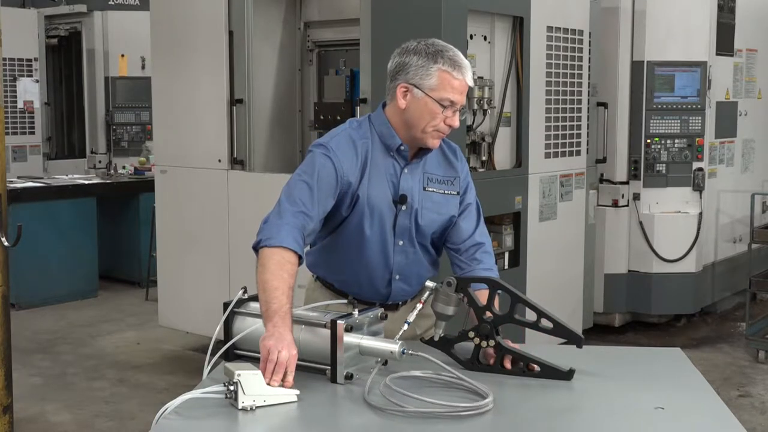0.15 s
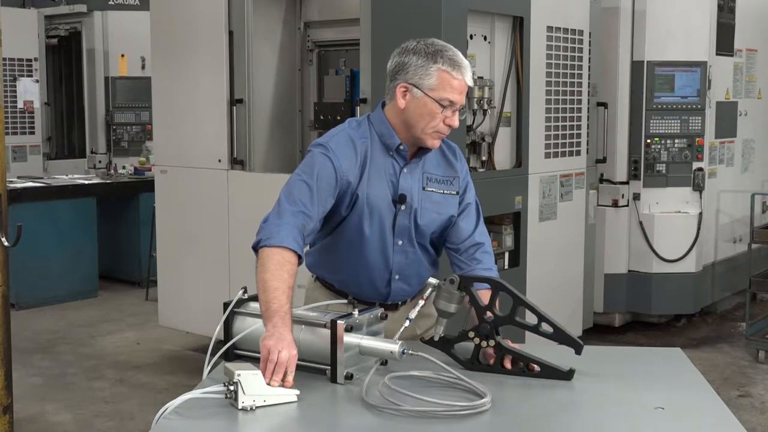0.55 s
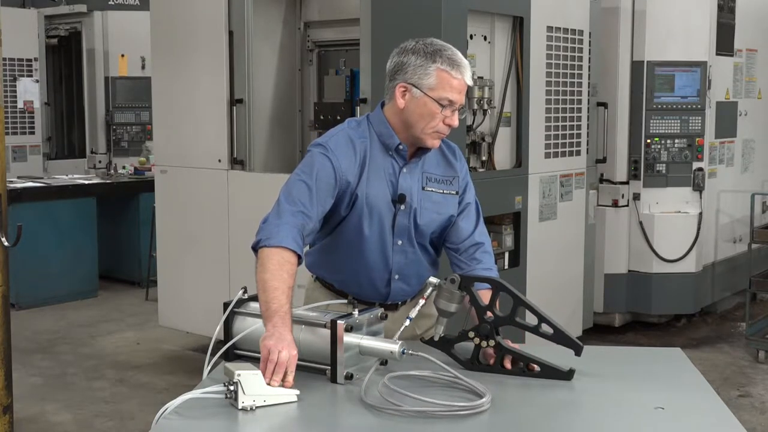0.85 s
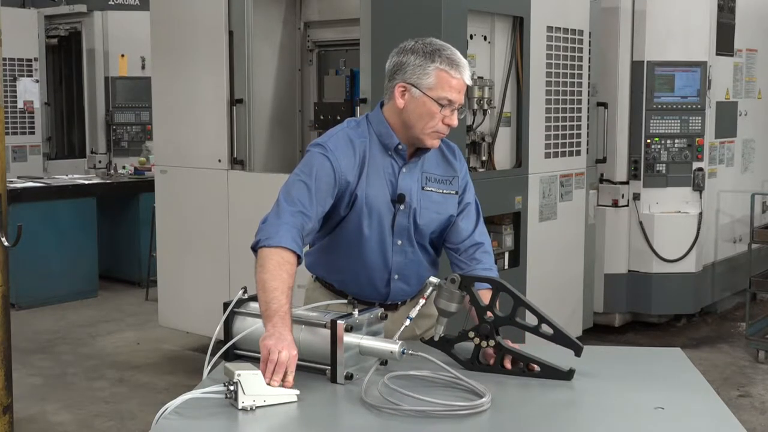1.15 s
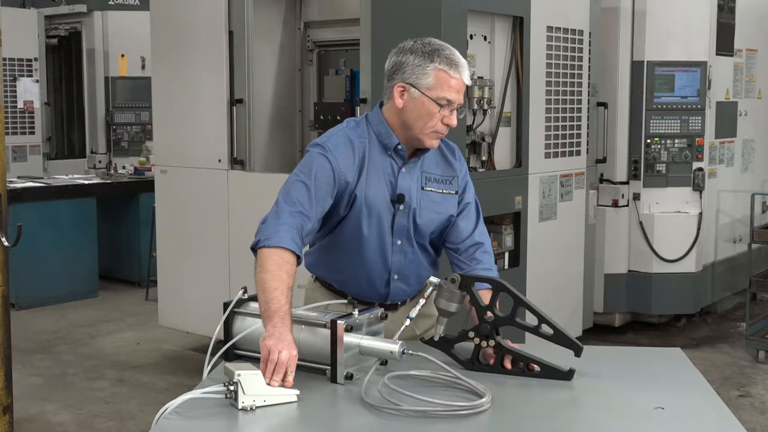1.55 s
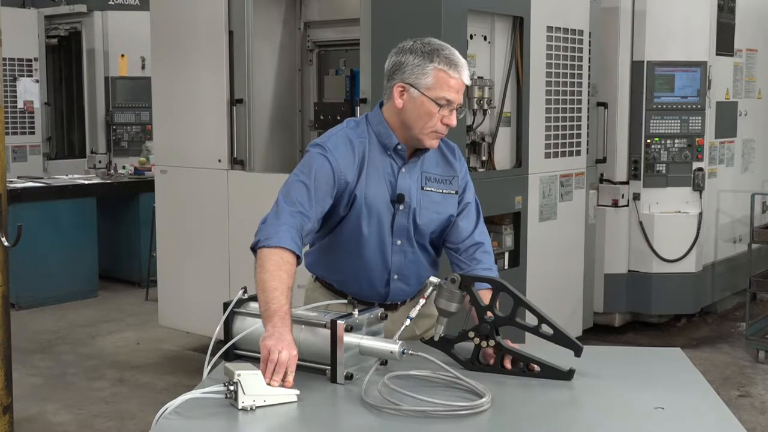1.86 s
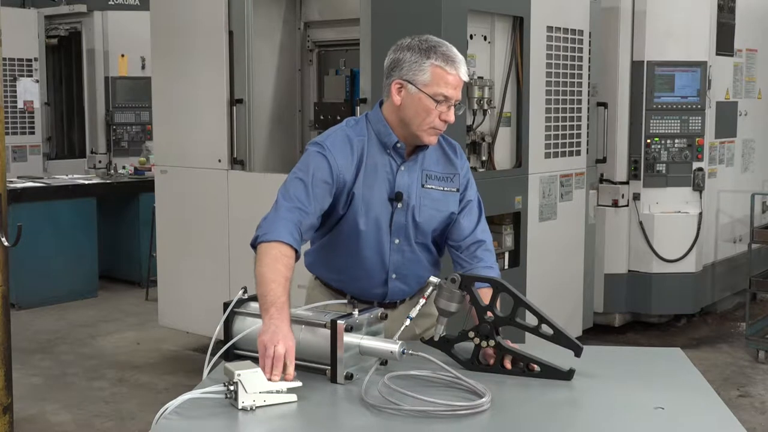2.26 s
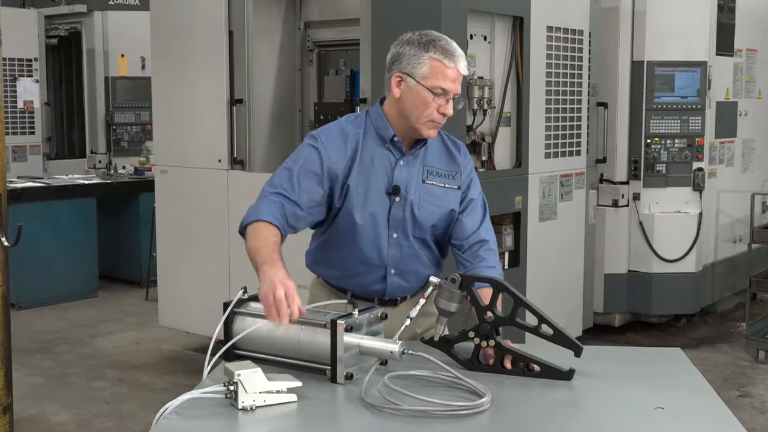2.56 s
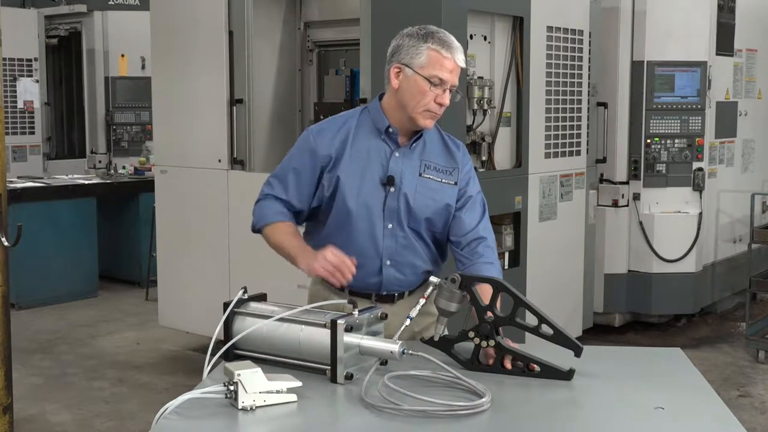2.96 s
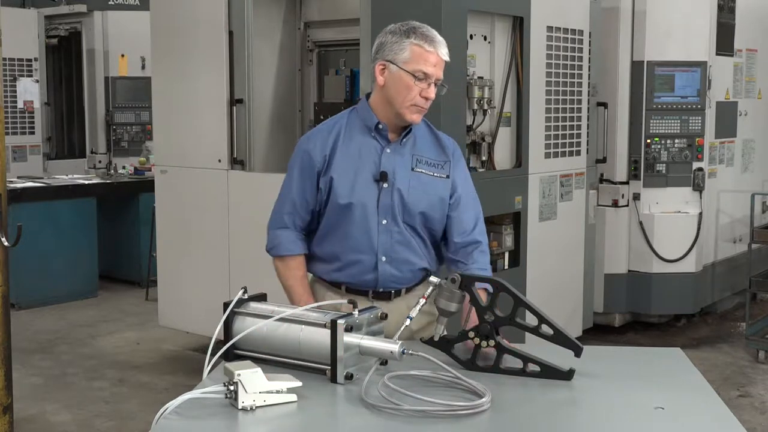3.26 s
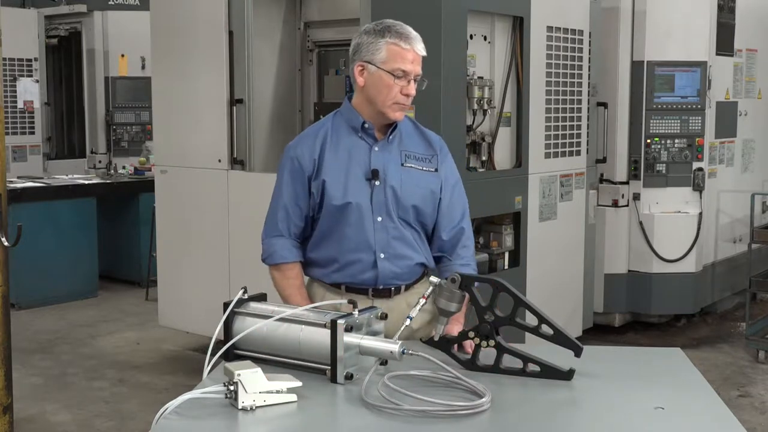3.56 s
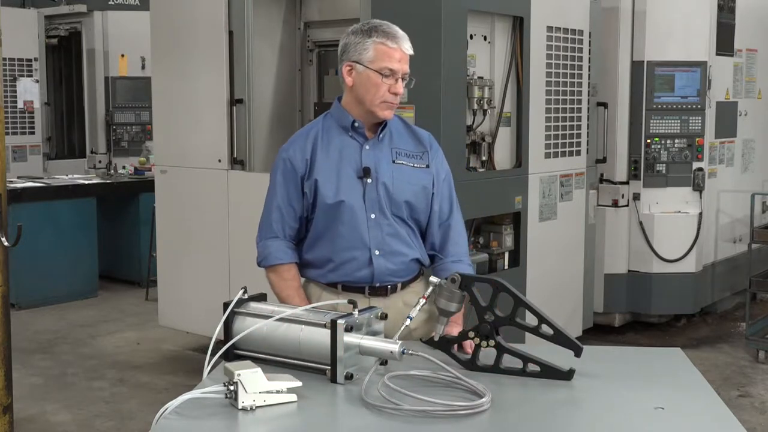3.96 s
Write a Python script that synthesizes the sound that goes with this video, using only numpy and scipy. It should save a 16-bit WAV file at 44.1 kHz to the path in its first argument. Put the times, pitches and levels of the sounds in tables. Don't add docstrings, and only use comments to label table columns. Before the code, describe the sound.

Compressed air rushes into a cylinder, the piston knocks on its stop, a thin singing hiss fades, then exhaust bursts out and slowly dies away.

```python
import sys
import numpy as np
from scipy import signal
from scipy.io import wavfile
from scipy.ndimage import uniform_filter1d

SR = 44100
rng = np.random.default_rng(int(sys.argv[2]) if len(sys.argv) > 2 else 0)


def makeup_ratio(level_db):
    decades = np.asarray(level_db, float) / 20
    return 10 ** decades


def generate_wav(signal):
    frames = np.transpose(np.atleast_2d(signal))
    scaled = np.clip(frames, -1, 1) * 32767
    pcm = np.round(scaled).astype(np.int16)
    wavfile.write(sys.argv[1], SR, pcm)


N = 181115
TIME = np.arange(N) / SR
FRAME = 1024
HZ = np.fft.rfftfreq(FRAME, 1 / SR)

STOP_S = 0.734
RELEASE_S, OPENING_S = 2.284, 0.04

# pitch_hz, width_hz, level_db
RUMBLE_MODES = [(142.5, 31, 3), (101, 71, -1), (300, 180, -14)]


def since(s):
    return np.maximum(TIME - s, 0)


def evened(x):
    return x / np.sqrt(np.mean(x ** 2) + 1e-20)


def read(points, hz):
    f, value = np.transpose(points)
    return np.interp(np.log(hz + 1), np.log(f + 1), value)


def resonate(x, hz, width):
    turn = np.exp(2j * np.pi * np.cumsum(hz * np.ones(len(x))) / SR)
    r = np.exp(-np.pi * width / SR)
    shifted = x * turn.conj() + 1e-18
    smooth = signal.lfilter([(1 - r) ** 2], [1, -2 * r, r ** 2], shifted)
    return 2 * (turn * smooth).real


def flutter(db, rate_hz):
    slow = signal.lfilter(*signal.butter(2, rate_hz, fs=SR), rng.standard_normal(N))
    return makeup_ratio(db * evened(slow))


def hiss(jet, jet_db, modes, patchy_db):
    power = 0
    for hz, width, db in modes:
        power = power + makeup_ratio(2 * db) / (1 + (2 * (HZ - hz) / width) ** 2) ** 2
    if jet:
        power = power + makeup_ratio(2 * (read(jet, HZ) + jet_db))
    re, im, patches = rng.standard_normal((4 * N // FRAME + 8, len(HZ), 3)).T
    patches = uniform_filter1d(patches, size=9, axis=0)
    patches = evened(uniform_filter1d(patches, size=9, axis=1))
    z = (re + 1j * im) * np.sqrt(power)[:, None] * makeup_ratio(patchy_db * patches)
    return evened(signal.istft(z, nperseg=FRAME, noverlap=3 * FRAME // 4)[1][:N])


def shop():
    # pitch_hz, level_db (per Hz)
    machines = [(24, -65.5), (40, -25), (108, 0), (223, -15.5), (249, -5.5), (433, -16.5), (811, -16),
                (1070, -16.5), (1610, -18), (3300, -22), (4290, -48), (7260, -120)]
    return makeup_ratio(-53) * hiss(machines, 0, [], patchy_db=0.0)


def stroke():
    # pitch_hz, level_db (per Hz)
    filling_jet = [(120, -46), (340, -12.5), (420, -24.5), (925, -7), (1300, -11.5), (2090, -11.5),
                   (3140, -3.5), (3580, -5.5), (5470, -4), (6330, -15.5), (7100, -21.5), (8300, -24.5),
                   (9500, -37), (13500, -55), (14500, -62)]
    # pitch_hz, width_hz, level_db
    filling_modes = [(930, 480, -11), (1602, 140, -2.5), (2174, 70, -20), (2680, 60, -3), (3165, 150, 4),
                     (3300, 60, -4), (3540, 40, -11), (4000, 120, -4), (4390, 160, 0), (4580, 48, -7),
                     (4750, 57, 2.5), (5200, 45, -9), (5340, 140, -3.5), (5680, 92, -2.5), (7360, 150, -21),
                     (10200, 64, -33)]
    jet_db = -24 - 2.0 * TIME
    jet = makeup_ratio(jet_db) * hiss(filling_jet, 2.0, filling_modes, patchy_db=1.0)
    jet = jet * flutter(db=0.4, rate_hz=110)
    fastest_s, arch_db_per_s2 = 0.24, 39
    rumble_db = -33 - arch_db_per_s2 * (TIME - fastest_s) ** 2
    rumble = makeup_ratio(rumble_db) * hiss(None, 0, RUMBLE_MODES, patchy_db=1.6)
    stop_db_per_s = 480
    return (jet + rumble) * makeup_ratio(-stop_db_per_s * since(STOP_S))


def edge():
    # loudest_s, level_db, lasting_s, pitch_hz, climb_hz_per_s
    lip_tones = [
        (2.58, -55.5, .3, 8450, -100),
        (2.88, -71, .25, 9800, 10),
        (3.54, -71, 0.32, 9600, 700),
        (3.8, -61, 0.42, 8250, 50),
        (3.95, -51.5, 0.5, 4600, 30),
        (.44, -53, .18, 7850, -3000),
    ]
    out, air = 0, rng.standard_normal(N)
    for s, db, lasting, hz, climb_hz in lip_tones:
        pitch_hz = hz + climb_hz * np.clip(TIME - s, -lasting, lasting)
        blown = resonate(air, pitch_hz, width=250)
        out = out + makeup_ratio(db) * np.exp(-((TIME - s) / lasting) ** 4) * evened(blown)
    flowing = (TIME < STOP_S) | (TIME > RELEASE_S + OPENING_S)
    return out * flowing


def knock():
    # start_s, peak_db, treble_tilt_db_per_khz
    blows = [
        (0.723, -16.5, 0.5),
        (1.184, -32.5, -12),
    ]
    # pitch_hz, level_db, t60_s
    ringing = [(189, -5, 0.031), (347, -2.5, 0.045), (506, -12, 0.015), (700, -4.5, 0.022),
               (870, -3.5, 0.029), (1084, -4, 0.019), (1710, 6.5, 0.01), (2450, -5, 0.011),
               (3400, -2.5, .02), (4600, -2, 0.028), (5670, -3, .012)]
    out = 0
    for s, peak_db, tilt_db in blows:
        t = since(s)
        softened = 1 - np.exp(-t / 0.0025)
        for k, (hz, db, t60) in enumerate(ringing):
            ring = np.sin(2 * np.pi * hz * t + k * np.pi)
            ring_db = peak_db + db + tilt_db * hz / 1000 - 60 * t / t60
            out = out - makeup_ratio(ring_db) * ring * softened
    return out


def bleed():
    # first_hz, last_hz, width_hz, first_db, last_db
    barrel = [(1577, 1600, 20, -17.5, -10.5), (2310, 2300, 30, -23, -10), (2710, 2700, 39, -23, -14),
              (3620, 3690, 42, -4.5, -3), (3830, 3820, 65, -22, -4), (4236, 4290, 33, -6, -3),
              (4490, 4500, 66, -15.5, -0.5), (4690, 4860, 62, 1.5, -1), (5005, 5160, 115, -4.5, -3),
              (5500, 5485, 81, -1.5, -4), (5686, 5930, 77, 3.5, -9.5), (6030, 6070, 54, -8, -19),
              (6270, 6300, 39, -20, -19), (6500, 6595, 84, -11, -33), (6900, 6965, 35, -9.5, -24),
              (7010, 7125, 51, -9.5, -28), (7410, 7560, 79, -11, -32), (7750, 7940, 100, -16, -27),
              (8120, 8280, 50, -27, -39), (9050, 9100, 90, -33, -70), (9800, 9850, 70, -35, -62),
              (8540, 8750, 82, -23.5, -51)]
    # pitch_hz, level_db (per Hz)
    thin_jet = [(900, -43), (1500, -16), (3200, -19.5), (3700, -2), (4730, -8), (5900, -14), (6330, -17),
                (8000, -21), (9000, -34), (11000, -39), (14000, -56)]
    from_s, to_s = 0.72, 2.32
    spent = np.clip((TIME - from_s) / (to_s - from_s), 0, 1)
    modes, air = 0, rng.standard_normal(N)
    for first_hz, last_hz, width, first_db, last_db in barrel:
        hz = first_hz + (last_hz - first_hz) * spent ** 0.433
        blown = resonate(air, hz, 1.47 * width)
        modes = modes + makeup_ratio(first_db + (last_db - first_db) * spent ** 1.3) * blown
    jet = makeup_ratio(-14.5 + 3.6 * spent) * hiss(thin_jet, 0, [], patchy_db=1.5)
    fading_db = -36.5 - 16.5 * spent ** 2.4
    missing_db = 3 * np.exp(-since(STOP_S) / 0.073)
    lasting = np.clip(np.minimum(TIME - from_s, to_s - TIME) / 0.02 + 1, 0, 1)
    return makeup_ratio(fading_db - missing_db) * (evened(modes) + jet) * flutter(db=0.43, rate_hz=110) * lasting


def whistle():
    loudest_s, rise_db_per_s, fall_db_per_s = 2.298, 1700, 1100
    drop_s = 0.006
    hz = 5940 + 400 * np.exp(-since(RELEASE_S) / drop_s)
    tone = np.sin(2 * np.pi * np.cumsum(hz) / SR) * flutter(db=2.0, rate_hz=170)
    level_db = np.minimum(rise_db_per_s * (TIME - loudest_s), -fall_db_per_s * (TIME - loudest_s))
    return np.sqrt(2) * makeup_ratio(-26.5 + level_db) * tone * np.minimum(since(RELEASE_S) / drop_s, 1)


def exhaust():
    # pitch_hz, level_db (per Hz)
    fast_jet = [(60, -31), (105, 6.5), (145, -12), (300, -20.5), (456, -24.5), (960, -8), (1300, -7.5),
                (2400, -10), (3170, -1.5), (4150, -9), (5320, -11.5), (8430, -27.5), (9830, -41.5),
                (13000, -55), (14500, -60)]
    # pitch_hz, width_hz, level_db
    fast_modes = [(2020, 11, -15), (2250, 45, -2.5), (2650, 84, 2), (3160, 210, -2.5), (4553, 160, -0.5),
                  (5210, 230, -3), (5630, 200, -5), (7540, 91, -35), (7750, 54, -25), (7830, 48, -23)]
    # pitch_hz, level_db (per Hz)
    slow_jet = [(60, -46), (120, -14), (260, -14), (450, -19), (930, -4.5), (1240, -16), (3170, -12),
                (3760, -12), (4560, -7), (7700, -14.5), (8300, -21), (10400, -46), (12000, -49),
                (13000, -46), (14500, -56)]
    # pitch_hz, width_hz, level_db
    slow_modes = [(1463, 190, -4), (2440, 250, -2.5), (3085, 43, -21), (4590, 180, -3), (4896, 37, 4.5),
                  (5310, 120, 0), (5730, 130, -2.5), (6000, 44, 1), (6100, 63, -9), (6920, 140, -10),
                  (7380, 170, -10), (8280, 84, -13)]
    # pitch_hz, width_hz, level_db
    port_modes = [(962, 110, 6), (837, 81, -1.5), (1060, 63, 0)]
    # pitch_hz, width_hz, level_db
    housing_modes = [(1620, 110, -3.5), (1760, 130, -1.5)]
    # level_db, fall_db_per_s, surge_db
    courses = [
        (-24.5, 15, 4),
        (-36, 3, -20),
        (-37, 6, 8),
        (-32.5, 9.5, 2.5),
    ]

    t = since(RELEASE_S + OPENING_S)
    opened = np.sin(np.pi / 2 * np.minimum(since(RELEASE_S) / OPENING_S, 1)) ** 2.4
    surge = np.exp(-t / 0.059)
    fast, slow, port, housing = [makeup_ratio(db - fall_db * t + surge_db * surge) for db, fall_db, surge_db in courses]
    fast = np.hypot(fast, makeup_ratio(-50.5))
    spit = makeup_ratio(-29.5) * np.exp(-((TIME - 2.301) / 0.0078) ** 2)
    housing = housing / makeup_ratio(np.minimum(350 * since(2.665), 19))

    fast = opened * fast * hiss(fast_jet, 0.5, fast_modes, patchy_db=1.94)
    slow = (opened * slow + spit) * hiss(slow_jet, 2.7, slow_modes, patchy_db=1.0)
    port = opened * port * hiss(None, 0, port_modes, patchy_db=0.65)
    housing = opened * housing * hiss(None, 0, housing_modes, patchy_db=1.7)
    kick = opened * makeup_ratio(-40) * np.exp(-t / 0.064) * hiss(None, 0, RUMBLE_MODES, patchy_db=1.0)
    return (fast + slow + port + housing + kick) * flutter(db=0.1, rate_hz=370)


def room(x):
    # pitch_hz, t60_s
    dying = [(200, 0.61), (1000, 0.66), (4000, 0.55), (9000, 0.38)]
    taps = np.zeros(SR // 2)
    at = np.arange(200, SR // 2 - 20, 20)
    taps[at + rng.integers(0, 20, len(at))] = rng.choice([-1., 1.], len(at))
    hz, t, z = signal.stft(taps, SR, nperseg=256)
    decay = makeup_ratio(-60 * t / read(dying, hz)[:, None])
    tail = signal.istft(z * decay, SR, nperseg=256)[1]
    return signal.fftconvolve(x, tail / np.linalg.norm(tail))[:N]


def scene():
    near = stroke() + edge() + knock() + bleed() + whistle() + exhaust()
    heard = near + makeup_ratio(-11.0) * room(near) + shop()
    return np.array([heard, heard])


def low_pass(x):
    return signal.sosfilt(signal.butter(12, 14450, fs=SR, output="sos"), x)


def record(dry):
    x = dry[0]
    level = np.sqrt(signal.lfilter([0.002], [1, -0.998], x ** 2) + 1e-7)
    rounded = 3.09 * level * np.tanh(x / (3.87 * level))
    bend = rounded ** 2 / level ** 0.57
    dull = signal.lfilter(*signal.butter(1, 700, fs=SR), bend)
    x = x - makeup_ratio(-0.5) * dull - makeup_ratio(-21.0) * bend
    x = signal.sosfilt(signal.butter(2, 130, "high", fs=SR, output="sos"), x)
    z = signal.stft(x, nperseg=512)[2]
    re, im = rng.standard_normal((2, 2) + z.shape)
    smooth = uniform_filter1d(abs(z), size=5, axis=0)
    grain = signal.istft(makeup_ratio(-18.5) * smooth * (re + 1j * im), nperseg=512)[1][:, :N]
    return low_pass((x + grain) * makeup_ratio([[1.05], [-1.05]]))


dry = scene()
out = record(dry)
generate_wav(out)
```